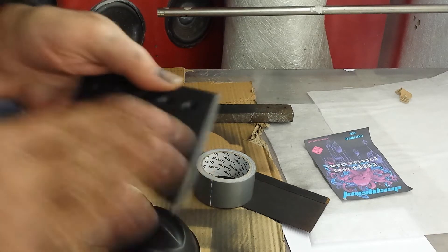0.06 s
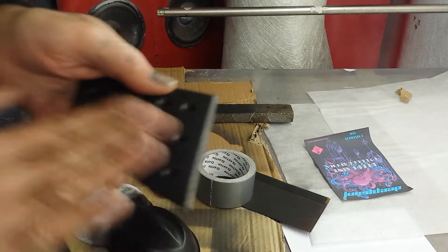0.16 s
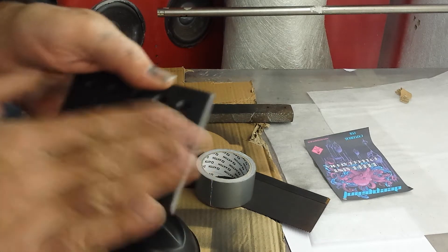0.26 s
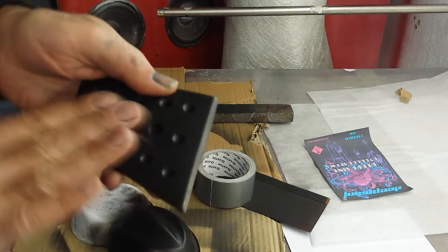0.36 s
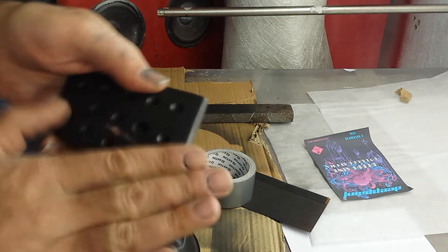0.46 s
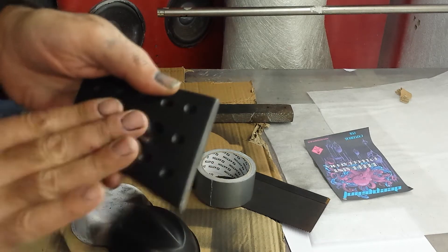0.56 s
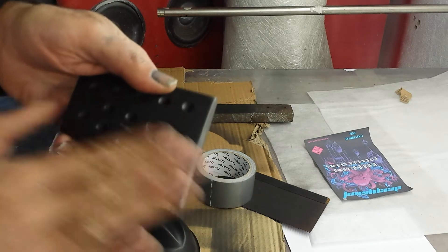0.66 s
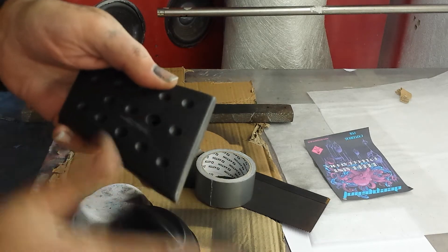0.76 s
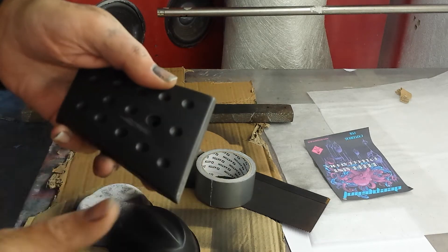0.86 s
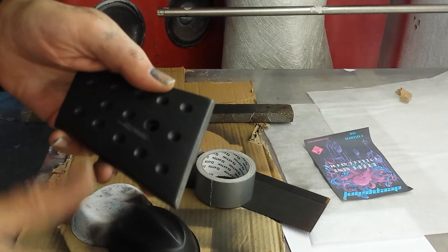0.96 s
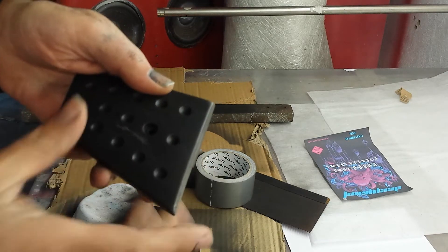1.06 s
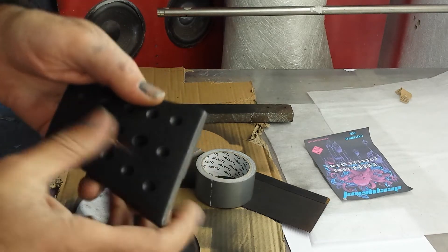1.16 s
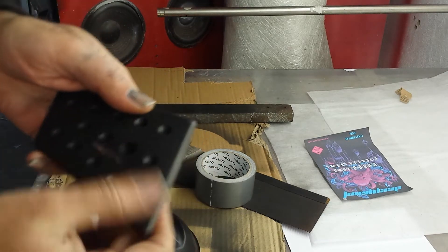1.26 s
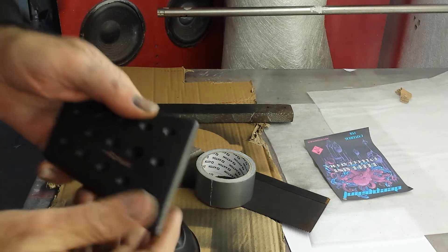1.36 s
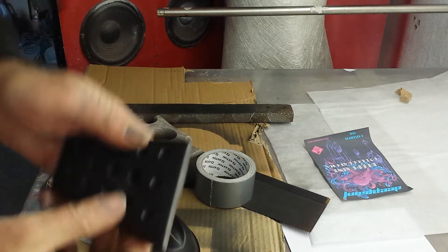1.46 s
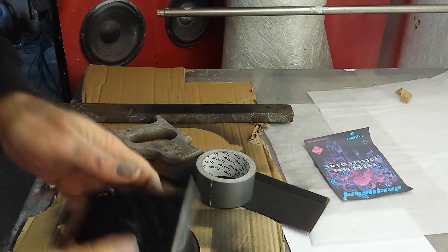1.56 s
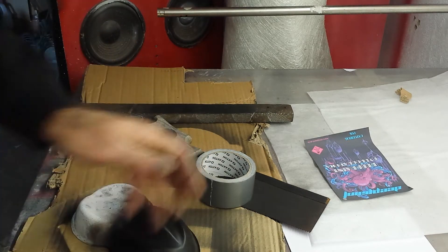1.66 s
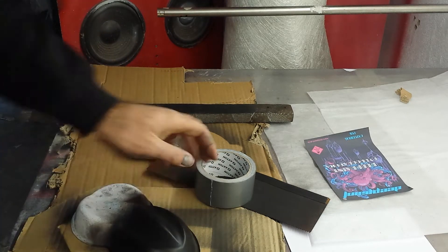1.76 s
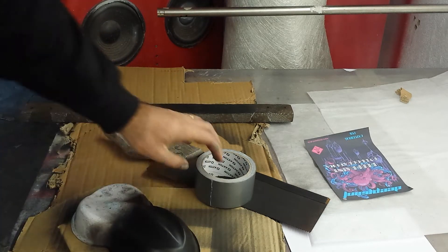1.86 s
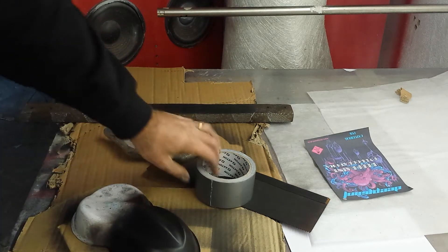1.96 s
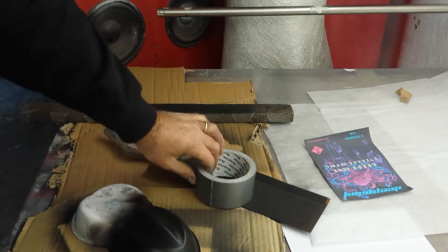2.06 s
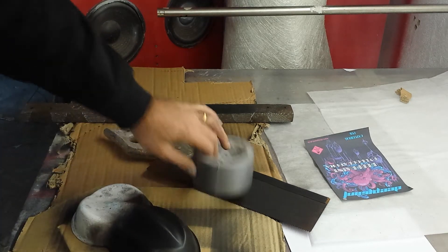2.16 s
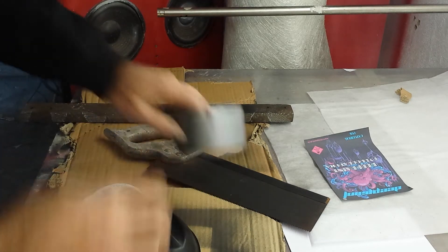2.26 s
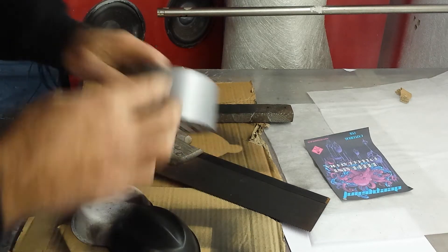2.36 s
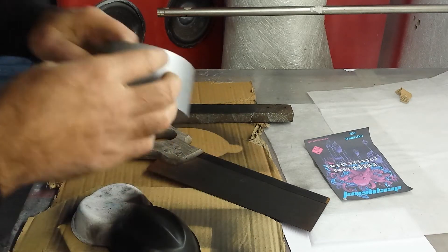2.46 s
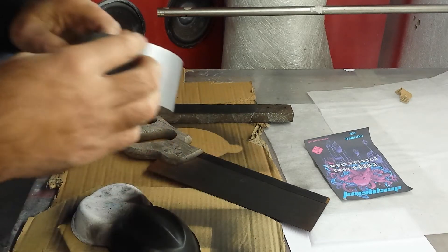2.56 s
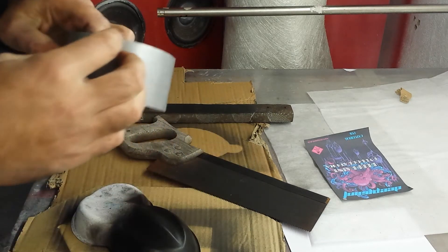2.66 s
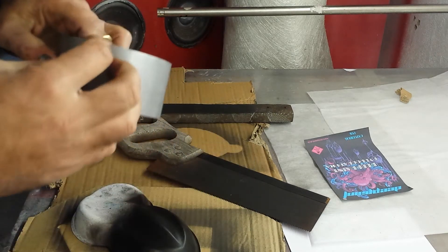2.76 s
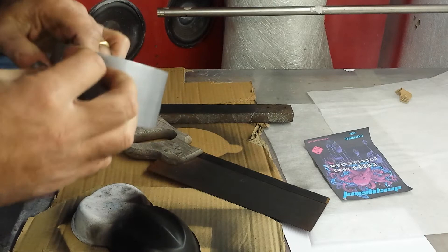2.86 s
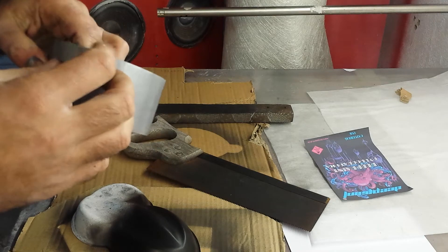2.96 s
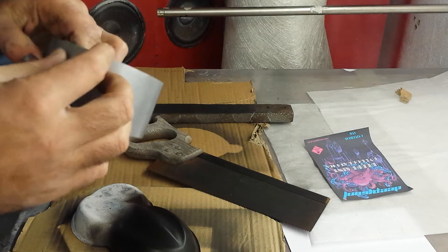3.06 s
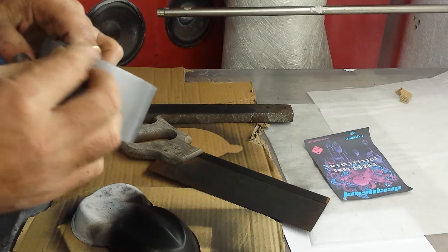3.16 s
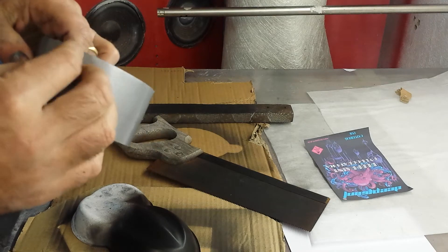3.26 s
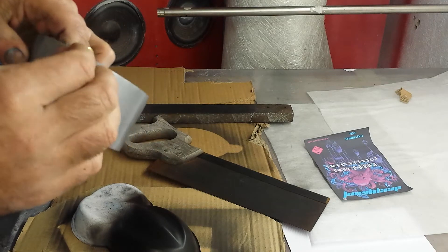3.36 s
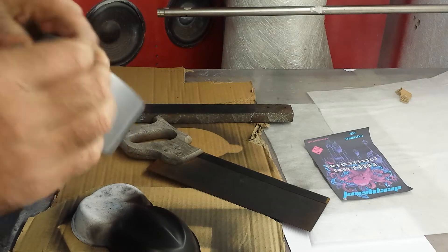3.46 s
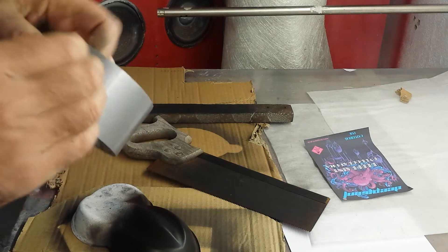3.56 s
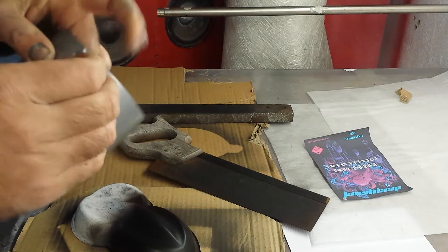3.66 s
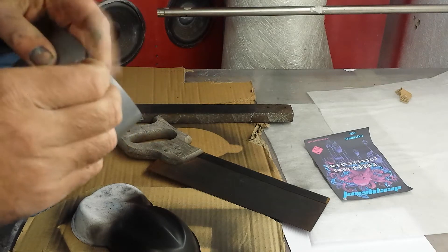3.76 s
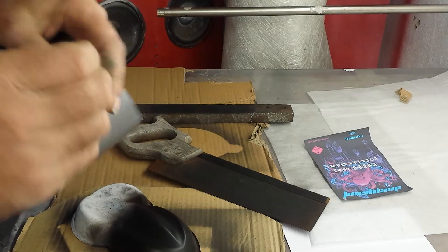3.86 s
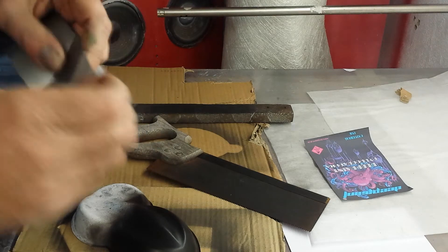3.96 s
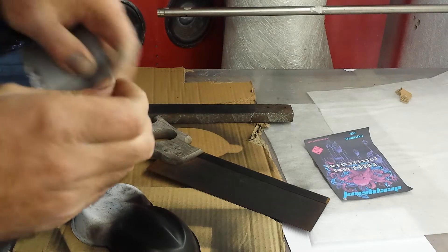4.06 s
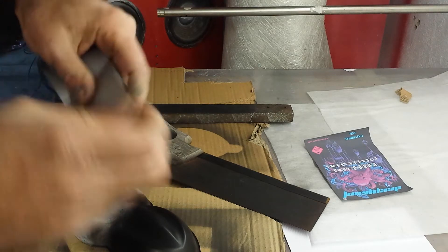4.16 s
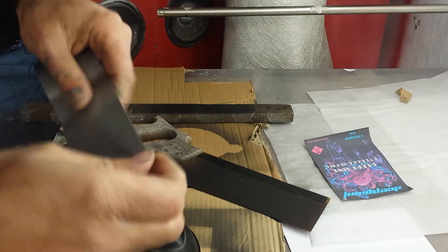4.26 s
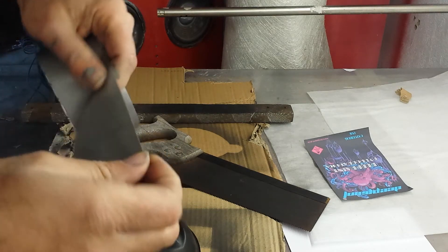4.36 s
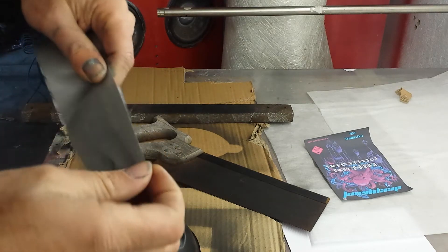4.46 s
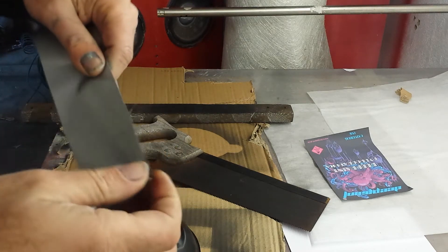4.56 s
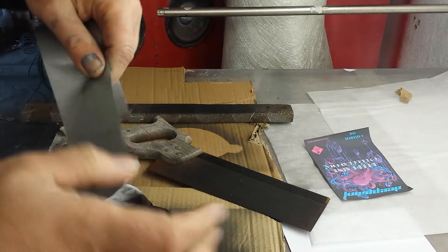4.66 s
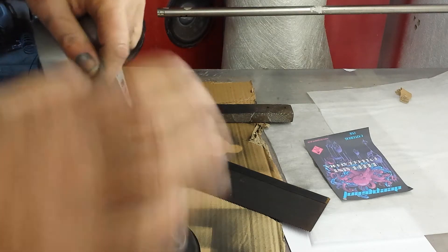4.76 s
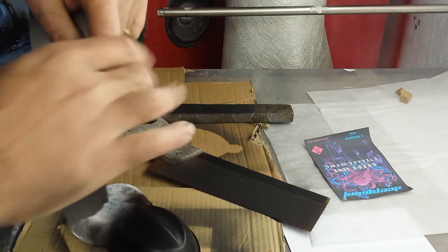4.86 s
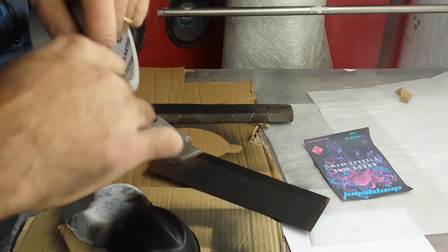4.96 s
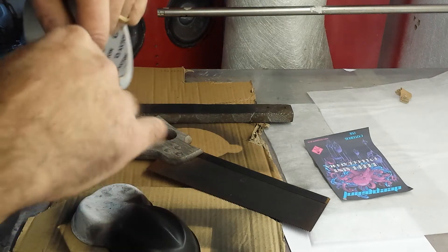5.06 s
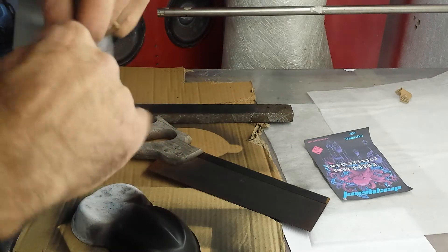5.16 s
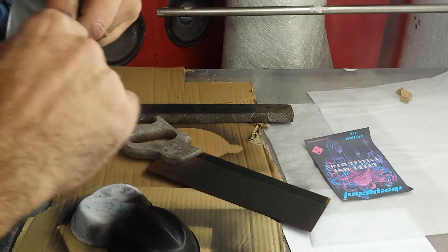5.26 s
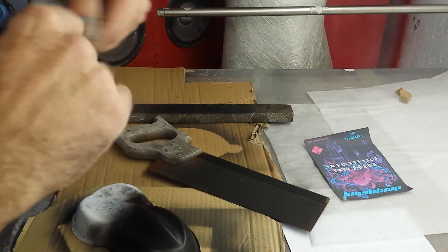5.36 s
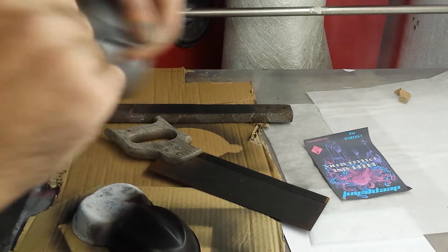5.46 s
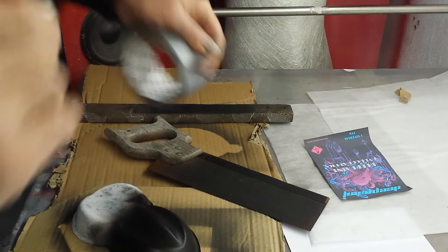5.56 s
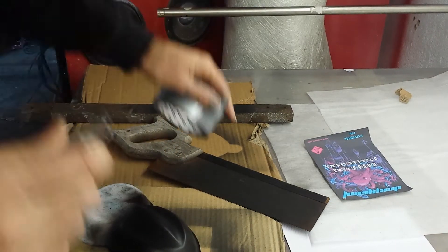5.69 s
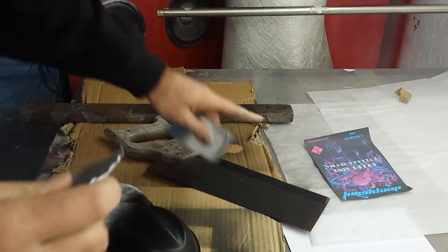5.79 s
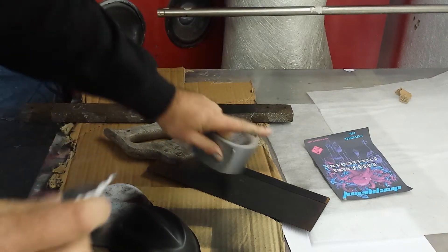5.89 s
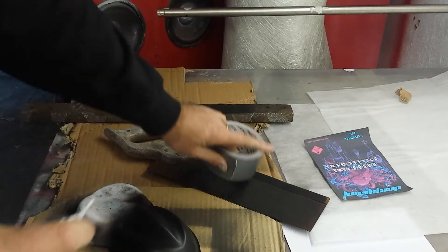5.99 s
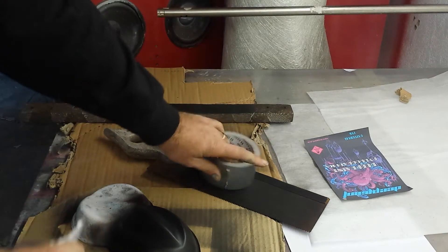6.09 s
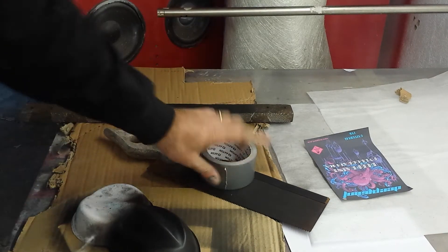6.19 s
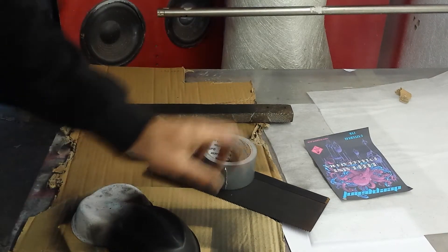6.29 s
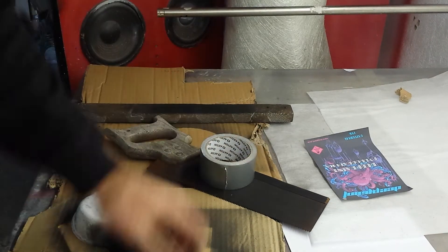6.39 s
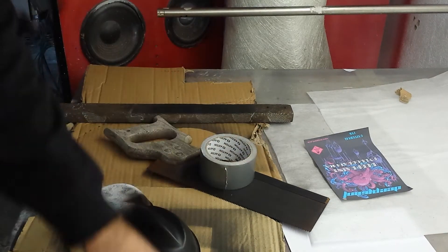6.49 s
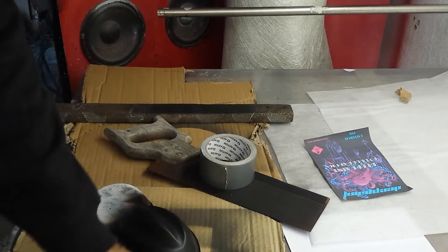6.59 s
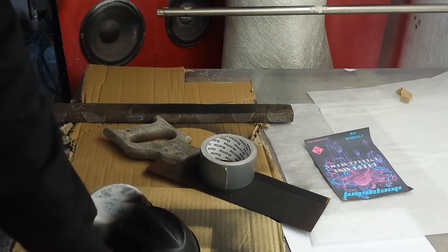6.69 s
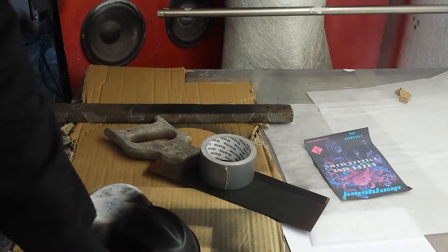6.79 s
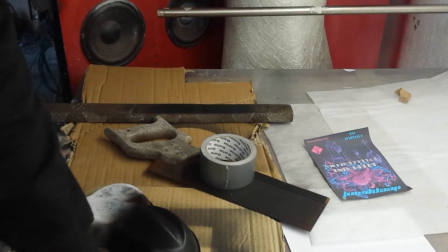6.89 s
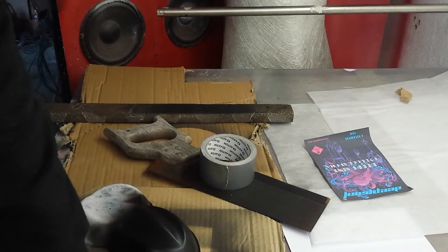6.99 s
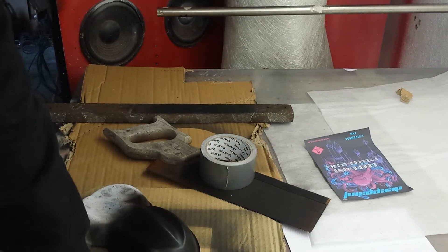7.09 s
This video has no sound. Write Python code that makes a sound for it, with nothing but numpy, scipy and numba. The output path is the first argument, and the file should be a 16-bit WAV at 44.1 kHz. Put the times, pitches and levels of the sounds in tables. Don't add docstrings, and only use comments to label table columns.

```python
import sys
import numpy as np
from scipy import signal
from scipy.fft import rfft, irfft, next_fast_len
from scipy.io import wavfile
from scipy.ndimage import uniform_filter1d
from numba import njit

SR = 44100
rng = np.random.default_rng(int(sys.argv[2]) if len(sys.argv) > 2 else 0)


def bounce(signal):
    frames = np.transpose(np.atleast_2d(signal))
    limited = np.clip(frames, -1, 1)
    pcm = np.round(limited * 32767).astype(np.int16)
    wavfile.write(sys.argv[1], SR, pcm)


def volts_from_decibels(level):
    exponent = np.asarray(level, float) / 20
    return 10 ** exponent


N = 314433
PAD = next_fast_len(N + SR)
HZ = np.arange(PAD // 2 + 1) * SR / PAD + 1e-3

# time [s], level [dB], free tape resonance [Hz].
PEEL = [
    [(3.36, -96, 1100), (3.37, -56, 1190), (3.436, -40, 1470), (3.47, -44, 1540), (3.492, -36.5, 1900),
     (3.53, -74, 1500)],
    [(3.765, -48, 1620), (3.773, -22, 1560), (3.8, -31.5, 1590), (3.82, -36, 2610), (3.86, -37, 2400),
     (3.92, -48, 2280)],
    [(4.056, -33, 1690), (4.074, -35, 1630), (4.114, -25, 1670), (4.145, -20.5, 1510), (4.165, -26, 1460),
     (4.19, -36, 1360)],
    [(5.24, -64, 1120), (5.31, -38, 2250), (5.326, -30, 2900), (5.36, -32, 2000), (5.396, -25, 2350),
     (5.45, -42, 2120)],
]
# pull on the roll at the start [dB], at the end [dB], sizzle [dB],
# brightness of its slips [dB].
GRIP = [
    (-8, 1, 1.5, 27.5),
    (-11, -2.5, 0.5, -10),
    (-8.5, 4.5, -10, 8),
    (-11, -6.5, -10, -17),
]
# frequency [Hz], density [dB per Hz].
TAPE_COLOUR = [(300, -20), (800, -28), (1150, 0), (1500, -1.5), (2300, -1), (3200, -6.5), (4500, -11),
               (8000, -20.5), (10800, -28), (13800, -19), (16000, -19)]
# frequency [Hz], width [Hz], level [dB].
TAPE_MODES = [
    [(1050, 90, 9), (1900, 90, -3)],
    [(1430, 82, 3), (2360, 52, 15), (2660, 70, 17.5), (3180, 67, 20)],
    [(1430, 38, 28), (1650, 100, 15), (2140, 70, 8), (2280, 55, 5)],
    [(1030, 65, 18), (2300, 63, 9), (2390, 70, 6), (3124, 68, 9)],
]
# frequency [Hz], width [Hz], level [dB].
ROLL_MODES = [(248, 56, -23), (377, 80, -1), (513, 99, -5), (786, 293, -5), (1058, 170, -6)]
# frequency [Hz], width [Hz], level [dB].
GRIP_MODES = [(126, 42, -5.5), (159, 38, 2.5), (206, 95, -4.5)]
# time [s], peak [dB], pitch [Hz].
LIFT_SLIPS = [(3.372, -44, 1044), (3.413, -42, 1920), (3.4277, -39, 1230), (3.4485, -36.5, 1050),
              (3.453, -51, 2600), (3.4743, -33, 1910), (3.488, -34.5, 1930)]
# time [s], peak [dB], pitch [Hz].
FIRST_SLIPS = [(3.7712, -36, 1360), (3.785, -28, 935), (3.7918, -21.5, 1290), (3.7957, -21, 1430),
               (3.7994, -16, 1430), (3.8015, -23, 1980), (3.8055, -26, 1570), (3.8147, -11.5, 2680),
               (3.819, -21, 3000), (3.826, -13, 2250), (3.8303, -16, 2680), (3.8357, -31, 2330),
               (3.8398, -16, 2340), (3.8433, -20.5, 3050), (3.8518, -30, 2370), (3.858, -30, 2330)]
# time [s], peak [dB], pitch [Hz].
LONG_SLIPS = [(4.0554, -14, 1430), (4.0612, -13.5, 2060), (4.0694, -20, 2010), (4.072, -15, 1360),
              (4.075, -9, 1520), (4.0813, -11, 1350), (4.086, -17, 1530), (4.091, -12.5, 1350),
              (4.0955, -15.5, 1370), (4.1004, -10.5, 1650), (4.1054, -14, 1730), (4.1098, -11, 1620),
              (4.1143, -12, 1520), (4.1209, -19, 1420), (4.126, -16, 1360), (4.1294, -17, 2110),
              (4.1348, -15.5, 2120), (4.1445, -11, 1260), (4.149, -16, 1770), (4.157, -16.5, 1540),
              (4.161, -23, 2250), (4.1655, -42, 1440)]
# time [s], peak [dB], pitch [Hz].
TEAR_SLIPS = [(5.2985, -42, 1110), (5.3033, -38, 3660), (5.312, -34, 2390), (5.3172, -35, 900),
              (5.3216, -25, 2830), (5.326, -24, 2540), (5.33, -24, 3000), (5.333, -24.5, 3480),
              (5.337, -24, 2240), (5.3461, -19.5, 1370), (5.3493, -27, 1350), (5.355, -20.5, 1900),
              (5.3596, -37, 1960), (5.3653, -17, 1130), (5.3685, -37, 2140), (5.374, -23, 2400),
              (5.377, -29, 1930), (5.3867, -20, 2410), (5.389, -27.5, 1540), (5.3945, -19.5, 2480),
              (5.4019, -21, 2440), (5.405, -34, 2400)]
# time [s], level [dB], pitch [Hz].
DRUM = [
    [(3.792, -33, 401.3), (3.812, -37.5, 403)],
    [(4.06, -34, 414), (4.072, -30.5, 410), (4.098, -31, 396), (4.162, -30.5, 408.6), (4.19, -35, 390)],
]
# time [s], peak [dB], brightness [dB].
TICKS = [(2.763, -49, 11), (2.774, -41, -8), (3.9805, -61, 20), (4.4935, -49, -15), (4.558, -29.5, -26),
         (4.6733, -46, -8), (5.2522, -34, -20), (5.279, -53, 9), (5.288, -58, 15), (5.297, -58, 14),
         (5.1613, -33, 5.5), (5.1695, -54, 0), (5.326, -33, -10), (5.398, -25, -3), (5.403, -14.5, -5),
         (5.7242, -31.5, 0.5), (6.125, -35.5, 6), (6.128, -45, -12), (6.13, -33, -18), (6.15, -29.5, -19)]
# time [s], knock [dB], bench boom [dB], plastic ring [dB],
# corner clack [dB].
HARD = [(1.317, -44.5, -41, -63, -62), (1.392, -44, -59, -52, -58), (1.407, -53, -63, -54, -51),
        (1.882, -20, -19, -42, -29), (1.911, -26, -41, -41.5, -38), (1.951, -37, -48, -62, -40),
        (1.98, -61, -48, -50, -60), (1.997, -20.5, -12.5, -45, -35), (2.04, -23.5, -27, -55, -42),
        (2.005, -31, -33, -42.5, -48), (2.129, -37, -43, -68, -57), (6.129, -24, -13, -50, -31.5),
        (6.142, -46, -35, -65, -37), (6.16, -52, -43, -65, -70), (6.523, -37, -29, -43, -45.5),
        (6.537, -43, -22.5, -51, -54), (6.555, -41.5, -34, -52, -62), (6.643, -37, -28, -55, -46),
        (6.928, -61, -28.5, -72, -67), (6.99, -42.5, -40.5, -67, -48), (7.082, -53, -60, -50, -73),
        (7.108, -67, -57, -48, -73)]
# time [s], knock [dB], bench boom [dB], plastic ring [dB],
# edge clack [dB].
SOFT = [
    (6.021, -21, -33, -56, -46),
    (6.029, -21.5, -17.5, -60, -55),
    (6.048, -33, -5.5, -62, -63),
    (6.0933, -23.5, -15.5, -40, -42),
    (6.098, -26, -30, -50, -48),
    (6.102, -25.5, -14.5, -56, -55),
]
# frequency [Hz], level [dB], t60 [s], left-right difference [dB].
BOOM = [(50.1, -24.5, 0.7, 6), (75.3, -16, 0.65, 4), (113, -25, 0.083, 10), (124, -0.5, 0.3, -13),
        (132.6, -5, 0.19, -22.5), (179.2, -10.5, 1, 4), (179.7, -9, 0.2, -23.5), (252, -14, 0.2, -17)]
# frequency [Hz], level [dB], t60 [s], left-right difference [dB].
FAR_BOOM = [(71, -16, 0.15, 7), (99, -18, 0.14, -8), (167, -25, 0.2, 4)]
# frequency [Hz], level [dB], t60 [s], left-right difference [dB].
BODY = [(310, -12, .1, 1), (381, 7, 0.11, -2), (617.6, 9, 0.11, 5), (738, 7.5, 0.055, 3),
        (970, 3, 0.081, -2), (1190, 2, 0.035, 9), (1350, -3, 0.015, -17), (2800, -17, 0.047, 7),
        (3150, -31, 0.0083, -15.5)]
# frequency [Hz], level [dB], t60 [s], left-right difference [dB].
RING = [(1860, 5, 0.032, -4), (1843, -3.5, 0.1, 3), (1930, -7, 0.021, 5), (2100, -12, 0.038, 12)]
# frequency [Hz], level [dB], t60 [s], left-right difference [dB].
CORE = [(402, -8, 0.09, 6), (970, -12, 0.027, 0), (1220, -8, 0.047, -2), (1690, -8, 0.015, 0),
        (2250, -16, 0.0096, -2)]
# frequency [Hz], density [dB per Hz].
THUD = [(60, -27), (150, -3), (300, 0.5), (550, -3.5), (1000, -15.5), (1500, -24), (2000, -21.5),
        (2800, -38), (4500, -46), (9000, -53)]
# frequency [Hz], density [dB per Hz].
SKIN = [(900, -20), (1700, 7.5), (2300, 9.5), (3000, 1.5), (4000, 0), (6000, -1), (9000, -6.5), (13000, -6),
        (16000, -7)]
# time [s], level [dB], length [s].
SHUFFLES = [(0.67, -58, 0.069), (1.185, -61.5, 0.29), (1.42, -63.5, 0.16), (4.506, -65.5, 0.2),
            (6.57, -65, 0.14), (1.93, -61, 0.08), (1.983, -54.5, 0.11), (2.14, -60, 0.25),
            (6.288, -62.5, 0.24), (6.852, -62.5, 0.97)]
# time [s], whirr level [dB].
DRONE = [(0, -50.5), (.9, -50), (1.7, -52.5), (2.2, -51), (2.6, -52), (3.2, -52.5), (3.7, -52.5),
         (4.3, -49), (4.7, -51), (5.8, -52), (6.3, -50.5), (6.5, -52.5), (6.8, -49.5), (7.13, -48)]
# frequency [Hz], density [dB per Hz].
RUMBLE = [(15, -45), (25, -10), (54, -0.5), (66, 2), (76, -17.5), (92, -1), (113, -0.5), (135, -7),
          (161, -16), (198, -3), (300, -22), (390, -18), (660, -120)]
# frequency [Hz], density [dB per Hz].
WHIRR = [(150, -33.5), (250, -2.5), (351, -6.5), (530, -1.5), (558, -12), (640, 1), (909, -7.5), (1040, -3),
         (1140, -11.5), (1320, -9), (5000, -33), (6500, -33), (11000, -120)]
# frequency [Hz], width [Hz], level [dB].
WHIRR_PEAKS = [(534.5, 4.4, 1), (622.7, 31, 7), (750.4, 22, -2), (780, 32, -1), (1024, 52, -5.5),
               (2032, 82, 7)]
# frequency [Hz], t60 [s].
ROOM_T60 = [(100, 0.59), (500, 0.53), (2000, 0.34), (4000, 0.36), (8000, 0.37), (14000, 0.28)]
# frequency [Hz], correlation [-1 to 1].
LIKENESS = [(60, 0.93), (180, 1), (550, 0.59), (1650, 0.075), (4970, -0.12), (15000, 0.33)]
# frequency [Hz], left-right difference [dB].
PORTS = [(60, -3.5), (110, -5), (200, -2), (380, 1), (700, -1), (1290, 5), (2380, 8.5), (4400, -2.5),
         (8120, 3.5), (15000, -2)]
# frequency [Hz], density [dB per Hz].
HISS = [(1470, -1), (2500, -1.5), (3160, -0.5), (3360, 0.5), (4990, -5.5), (7080, -6), (12200, -6.5),
        (14700, -3), (16000, -1.5)]

SLIP_GAIN_DB, TWANG_WIDTH_HZ, BRIGHT_GROWS = 3, 430, 0.28
HANDS_LAG = 26
SQUEAK_S, SQUEAK_LENGTH_S, SQUEAK_FROM_HZ, SQUEAK_TO_HZ, SQUEAK_DB = 3, 0.0386, 300, 900, -47.5
CLACK_LEADS_S, CONTACT_MS, CONTACT_GROWS = 0.0014, 1.66, 0.21
RING_SCATTER_DB, BOOM_SCATTER_DB = 1.5, 2.0
STROKE_COUNT, STROKE_FIRST_S, STROKE_EVERY_S, STROKE_LENGTH_S = 6, 0.025, 0.1155, 0.096
STROKE_DB, STROKE_TIRES_DB = -52.5, -0.25
RUMBLE_DB, RUMBLE_FOLLOWS = -51.5, 1.55
ROOM_BASS_CUT_HZ = 450
HISS_DB = -65.5


def rms_one(x):
    return x / np.sqrt(np.mean(x ** 2) + 1e-20)


def at_hz(points, hz):
    points = np.array(points)
    return np.interp(np.log(hz), np.log(points[:, 0]), points[:, 1])


def in_time(rows, rest):
    s, *columns = np.transpose(rows)
    return [np.interp(np.arange(N) / SR, s, c, r, r) for c, r in zip(columns, rest)]


def coloured(x, spectrum):
    hz = np.arange(4097) * SR / 8192 + 1e-3
    cepstrum = irfft(np.log(volts_from_decibels(at_hz(spectrum, hz))))
    cepstrum[1:4096] *= 2
    cepstrum[4097:] = 0
    response = irfft(np.exp(rfft(cepstrum)))
    return signal.oaconvolve(np.atleast_2d(x), response[None], axes=1)[:, :N]


def resonate(x, modes):
    out = 0
    for k, (hz, width, level_db) in enumerate(modes):
        r = np.exp(-np.pi * width / SR)
        zeros = [(1 - r * r) / 2, 0, (r * r - 1) / 2]
        poles = [1, -2 * r * np.cos(2 * np.pi * hz / SR), r * r]
        out = out + (-1) ** k * volts_from_decibels(level_db) * signal.lfilter(zeros, poles, x + 1e-18)
    return out


@njit
def gliding(x, hz, r, rate):
    out = np.zeros(len(x))
    for i in range(2, len(x)):
        push = (1 - r * r) / 2 * (x[i] - x[i - 2])
        swing = 2 * r * np.cos(2 * np.pi * hz[i] / rate) * out[i - 1]
        out[i] = push + swing - r * r * out[i - 2]
    return out


def diffuse(length):
    mid, side = rfft(rng.standard_normal((2, length)), PAD)
    alike = np.clip(at_hz(LIKENESS, HZ), -1, 1)
    shared = np.sqrt((1 + alike) / 2) * mid
    opposed = np.sqrt((1 - alike) / 2) * side * [[1], [-1]]
    return irfft(shared + opposed, PAD)[:, :length]


def drift(rate):
    knots = rng.standard_normal(int(N / SR * 200) + 2)[:int(N / SR * rate) + 2]
    return np.interp(np.arange(N) / SR * rate, np.arange(len(knots)), knots)


def bursts(times, levels_db, decay_s):
    jumps = np.zeros(N)
    jumps[np.round(np.multiply(times, SR)).astype(int)] = volts_from_decibels(np.asarray(levels_db))
    return signal.lfilter([1], [1, -np.exp(-1 / (decay_s * SR))], jumps + 1e-18)


def tape():
    level, pull, centre_hz, sizzle = np.zeros((4, N))
    for rip, (first_db, last_db, sizzle_db, _) in zip(PEEL, GRIP):
        level_db, rip_hz = in_time(rip, rest=(-200, 0))
        pull_db, = in_time([(rip[0][0], first_db), (rip[-1][0], last_db)], rest=[0])
        level += volts_from_decibels(level_db)
        pull += volts_from_decibels(level_db + pull_db)
        centre_hz += rip_hz
        sizzle += volts_from_decibels(level_db + sizzle_db)
    s, peak_db, slip_hz = slip_list()
    rip_ends = [rip[-1][0] for rip in PEEL]
    slip_rip = np.searchsorted(rip_ends, s)
    bright_db = np.array(GRIP)[slip_rip, -1] + BRIGHT_GROWS * (peak_db + 13)
    s = s + 0.000956

    snaps = glue_grains(per_s=10000, spread_db=1.0, shared=0.8)
    creep = snaps * volts_from_decibels(-3.0) * level * volts_from_decibels(0.55 * drift(150))
    jerk = bursts(s, peak_db - 3.0, decay_s=0.00009) * [[1], [0.7]]
    slips = jerk + snaps * bursts(s, peak_db - 9.0, decay_s=0.0017)
    drive = creep + slips

    latest = np.clip(np.searchsorted(s * SR, np.arange(N)) - 1, 0, None)
    membrane_r, twang_r = np.exp(-np.pi * 600 / SR), np.exp(-np.pi * TWANG_WIDTH_HZ / SR)
    membrane = np.array([gliding(v, centre_hz, membrane_r, SR) for v in creep])
    twang = np.array([gliding(v, slip_hz[latest], twang_r, SR) for v in slips])
    narrow = signal.butter(4, 1050, "high", fs=SR, output="sos")
    strip = signal.sosfilt(narrow, volts_from_decibels(-38.0) * membrane + volts_from_decibels(13.5) * twang)

    during = np.searchsorted(rip_ends[:-1], np.arange(N) / SR)
    rung = sum(resonate(drive * (during == k), modes) for k, modes in enumerate(TAPE_MODES))
    sheet = volts_from_decibels(1.5) * coloured(drive, TAPE_COLOUR) + volts_from_decibels(-13.5) * rung

    fine_level = volts_from_decibels(-8.0) * sizzle + bursts(s, peak_db + bright_db - 26.5, decay_s=0.0027)
    fine = glue_grains(per_s=17000, spread_db=-2.5, shared=0.38) * fine_level
    crack = coloured(fine, [(2000, -32), (5000, -5.0), (10500, -11), (14000, -8.5), (16000, -8)])

    pull_share = pull / (level + 1e-9)
    tug = drive.mean(axis=0) * pull_share
    roll = volts_from_decibels(14.5) * resonate(tug, ROLL_MODES) + volts_from_decibels(15.5) * resonate(tug * pull_share, GRIP_MODES)
    left, right = sheet + strip + crack
    return np.array([left, np.roll(right, HANDS_LAG)]) + roll


def glue_grains(per_s, spread_db, shared):
    sizes = volts_from_decibels(spread_db * np.minimum(rng.exponential(1, N), 3))
    sizes = sizes * (rng.random(N) < per_s / SR)
    signs = rng.choice([-1, 1], (3, N))
    return rms_one(sizes * (shared * signs[0] + signs[1:]))


def slip_list():
    s, peak_db, hz = np.transpose(LIFT_SLIPS + FIRST_SLIPS + LONG_SLIPS + TEAR_SLIPS)
    return s, peak_db + SLIP_GAIN_DB, hz


def drumming():
    out = np.zeros(N)
    for tug in DRUM:
        level_db, hz = in_time(tug, rest=(-200, 400))
        fade = uniform_filter1d(volts_from_decibels(level_db + 1.0 + 1.7 * drift(90)), size=200)
        wavering_hz = hz * (1 + 0.03 * drift(120))
        out += fade * np.sin(2 * np.pi * np.cumsum(wavering_hz) / SR)
    return out


def squeak():
    age = np.clip((np.arange(N) / SR - SQUEAK_S) / SQUEAK_LENGTH_S, 0, 1)
    hz = SQUEAK_FROM_HZ + (SQUEAK_TO_HZ - SQUEAK_FROM_HZ) * age
    phase = 2 * np.pi * np.cumsum(hz) / SR
    return volts_from_decibels(SQUEAK_DB + 2.0 * drift(112)) * np.sin(np.pi * age) * np.sin(phase)


def ticks():
    s, peak_db, bright_db = np.transpose(TICKS)
    dull = rng.standard_normal((2, N)) * bursts(s, peak_db - 8.5, decay_s=0.00037)
    bright = rng.standard_normal((2, N)) * bursts(s, peak_db + bright_db + 0.5, decay_s=0.00068)
    return (coloured(dull, [(500, -30), (1500, 7), (2500, 4.5), (5000, 6.5), (9000, -5.5)])
            + coloured(bright, [(4000, -2.5), (9000, -7.0), (13500, -8.0), (16000, 1.0)]))


def knocks():
    s, knock_db, boom_db, ring_db, clack_db = np.transpose(HARD + SOFT)
    hard = np.arange(len(s)) < len(HARD)
    soft_knock_db, soft_boom_db = np.where(hard, -200, knock_db), np.where(hard, -200, boom_db)
    core = strike(soft_knock_db, CORE, scatter_db=2.0, rough=0.59, slower=0.04)
    far = strike(soft_boom_db, FAR_BOOM, BOOM_SCATTER_DB, rough=0.05, slower=1.0)
    boom = strike(boom_db - 4.0, BOOM, BOOM_SCATTER_DB, rough=0.061, slower=0.37)
    body = strike(knock_db - 16.5, BODY, scatter_db=3.5, rough=2.5, slower=0.15)
    ring = strike(ring_db + 4.0, RING, RING_SCATTER_DB, rough=0.18, slower=0.021)
    thud = coloured(diffuse(N) * bursts(s, knock_db + 8.5, decay_s=0.02), THUD)
    corner = diffuse(N) * bursts(s - CLACK_LEADS_S, clack_db + 7.5, decay_s=0.0011)
    clack = coloured(corner, [(500, -15), (1300, 1), (3000, 3.5), (4200, -15.5), (9000, -40)])
    return far + core + boom + body + thud + clack + ring


def strike(levels_db, modes, scatter_db, rough, slower):
    hz, level_db, t60, pan_db = np.transpose(modes)
    scatter = scatter_db * rng.standard_normal((len(levels_db), len(modes)))
    strength = volts_from_decibels(levels_db[:, None] + level_db + scatter)
    push = np.full((len(modes), N + 1500), 1e-18)
    for (s, knock_db, boom_db, *_), each in zip(HARD + SOFT, strength):
        contact_ms = max(CONTACT_MS * volts_from_decibels(CONTACT_GROWS * (boom_db - knock_db)), 0.3)
        age = np.arange(1500) / (contact_ms * slower * SR / 1000)
        shape = age * np.exp(-age)
        start = round(s * SR)
        push[:, start:start + 1500] += each[:, None] * shape / shape.sum()
    push = push[:, :N] * (1 + rough * rng.standard_normal(N))
    r, w = volts_from_decibels(-60 / (t60 * SR)), 2 * np.pi * hz / SR
    rings = [signal.lfilter([0, np.sin(w[k])], [1, -2 * r[k] * np.cos(w[k]), r[k] ** 2], v)
             for k, v in enumerate(push)]
    pan = volts_from_decibels(np.outer([0.5, -0.5], pan_db)) * (-1) ** np.arange(len(modes))
    return pan @ np.array(rings)


def rubbing():
    t = np.arange(N) / SR
    strokes = [(STROKE_FIRST_S + k * STROKE_EVERY_S, STROKE_DB + k * STROKE_TIRES_DB, STROKE_LENGTH_S)
               for k in range(STROKE_COUNT)]
    swell = np.zeros(N)
    for s, level_db, length_s in strokes + SHUFFLES:
        swell += volts_from_decibels(level_db) * np.exp(-(2.38 * (t - s) / length_s) ** 2)
    return swell * rms_one(coloured(diffuse(N), SKIN))


def drone():
    whirr_db, = in_time(DRONE, rest=[None])
    rumble_db = RUMBLE_DB + RUMBLE_FOLLOWS * (whirr_db - whirr_db.mean())
    lumps_db, flutter_db = 1.5 * drift(7), 0.6 * drift(9)
    air = coloured(diffuse(N), WHIRR)
    whirr = rms_one(air + volts_from_decibels(2.5) * resonate(air, WHIRR_PEAKS)) * volts_from_decibels(whirr_db + flutter_db)
    rumble = rms_one(coloured(diffuse(N), RUMBLE)) * volts_from_decibels(rumble_db + lumps_db)
    return rumble + whirr


def room(x, early_db, late_db):
    t = np.arange(SR // 2) / SR
    edges_hz = 60 * 2 ** np.arange(0, 8.6, 0.5)
    noise, tail = diffuse(SR // 2), 0
    for low, high in zip(edges_hz, edges_hz[1:]):
        band = signal.sosfilt(signal.butter(2, [low, high], "band", fs=SR, output="sos"), noise)
        tail = tail + band * volts_from_decibels(-60 * t / at_hz(ROOM_T60, np.sqrt(low * high)))
    late = volts_from_decibels(late_db) * tail * (1 - np.exp(-t / 0.00059))
    early = volts_from_decibels(early_db) * diffuse(SR // 2) * np.exp(-t / 0.0065)
    answer = signal.lfilter(*signal.butter(1, ROOM_BASS_CUT_HZ, "high", fs=SR), late + early)
    answer[:, 0] += 1
    return signal.oaconvolve(x * np.ones((2, 1)), answer, axes=1)[:, :N]


def scene():
    hands = room(tape() + squeak(), early_db=-23.0, late_db=-29)
    bench = room(knocks(), early_db=-22.5, late_db=-28.5)
    nails = room(ticks(), early_db=-20.0, late_db=-26)
    return hands + bench + nails + drumming() + rubbing() + drone()


def low_pass(x):
    return signal.sosfilt(signal.butter(12, 16660, fs=SR, output="sos"), x)


def record(dry):
    ports = [coloured(v, [(hz, side * db / 2) for hz, db in PORTS])[0] for v, side in zip(dry, (1, -1))]
    hiss_level = volts_from_decibels(HISS_DB + 5.5) * volts_from_decibels(np.array([[-1], [1]]))
    hiss = hiss_level * rms_one(coloured(rng.standard_normal((2, N)), HISS))
    mix = signal.sosfilt(signal.butter(3, 42, "high", fs=SR, output="sos"), np.array(ports) + hiss)
    mix = signal.sosfilt(signal.cheby2(18, 45, 15950, fs=SR, output="sos"), mix)
    return low_pass(mix)


dry = scene()
out = record(dry)
bounce(out)
```